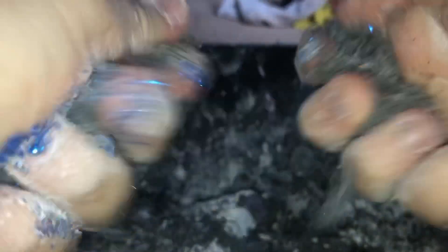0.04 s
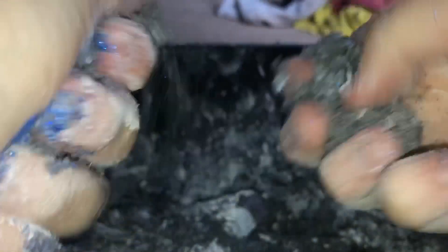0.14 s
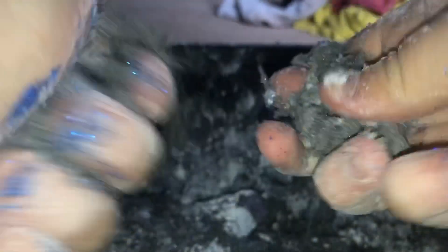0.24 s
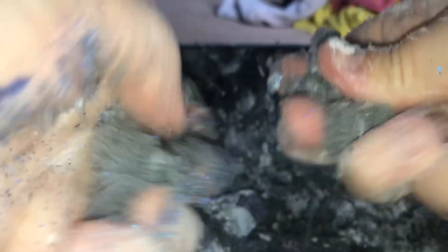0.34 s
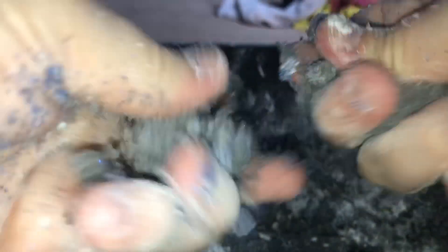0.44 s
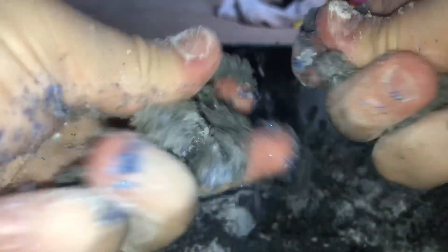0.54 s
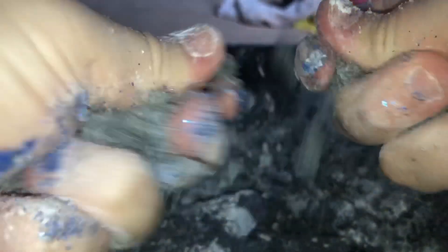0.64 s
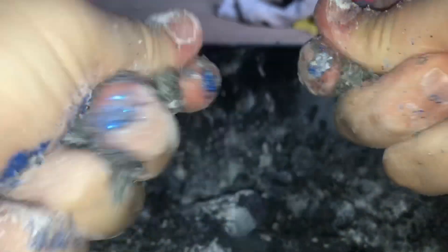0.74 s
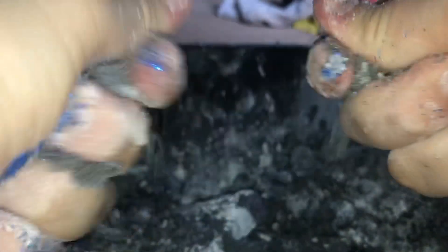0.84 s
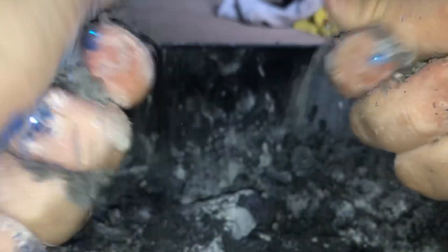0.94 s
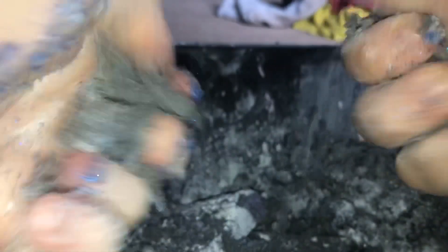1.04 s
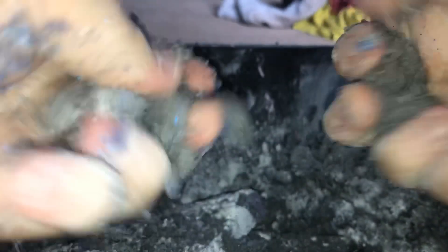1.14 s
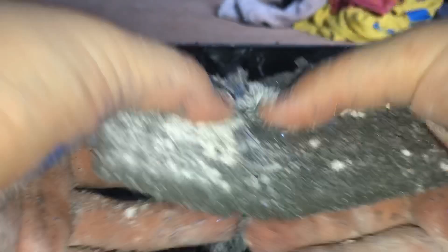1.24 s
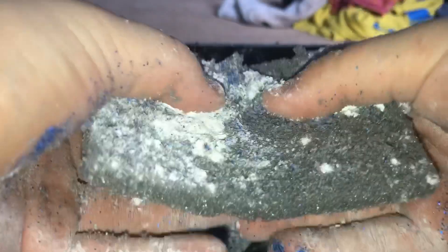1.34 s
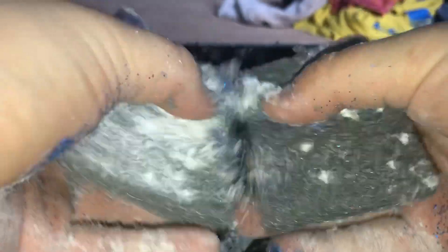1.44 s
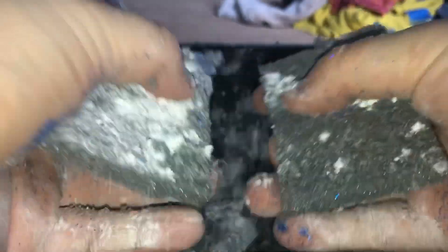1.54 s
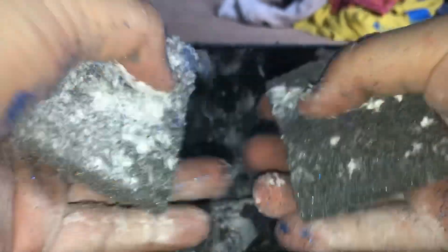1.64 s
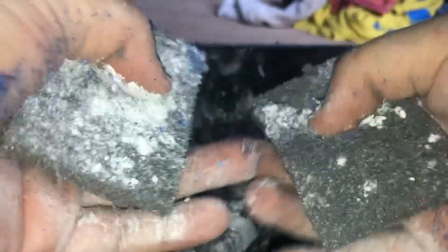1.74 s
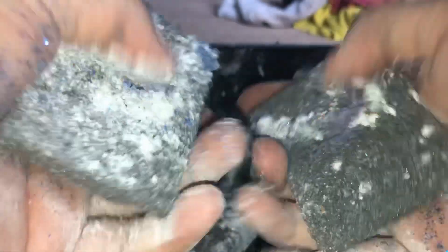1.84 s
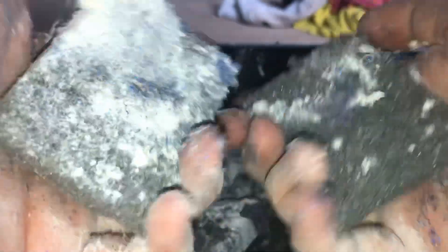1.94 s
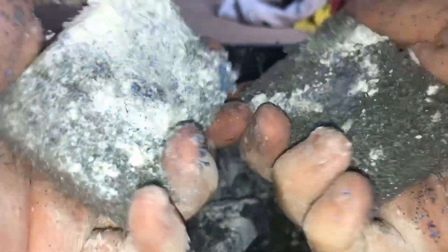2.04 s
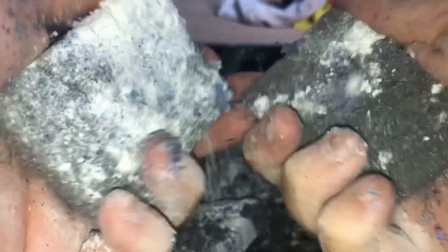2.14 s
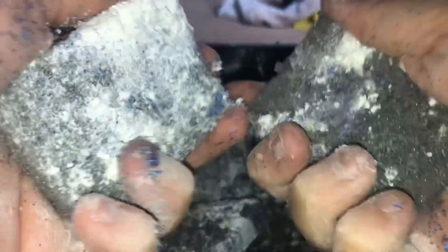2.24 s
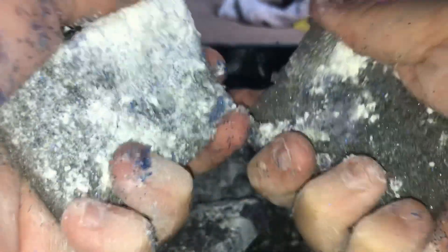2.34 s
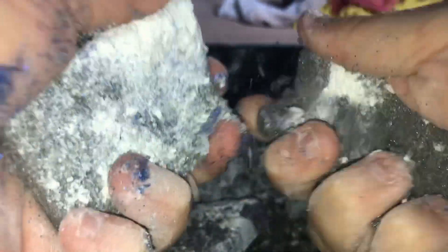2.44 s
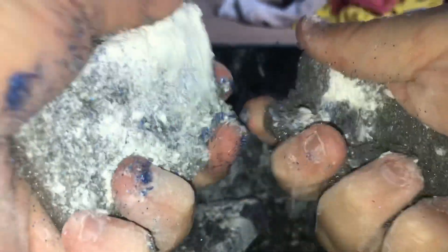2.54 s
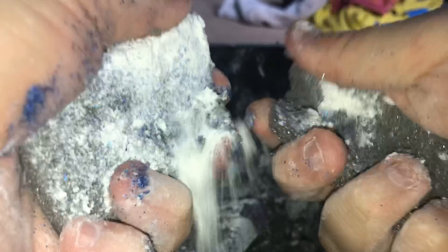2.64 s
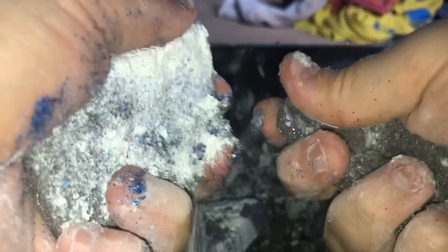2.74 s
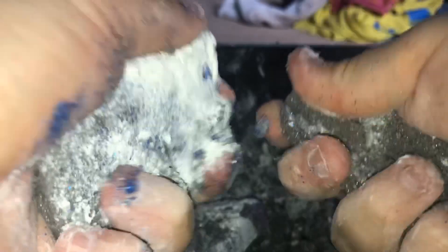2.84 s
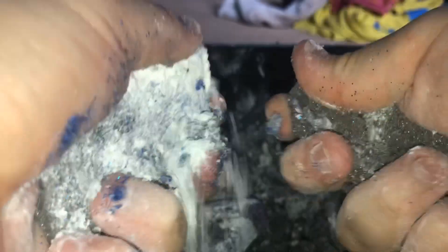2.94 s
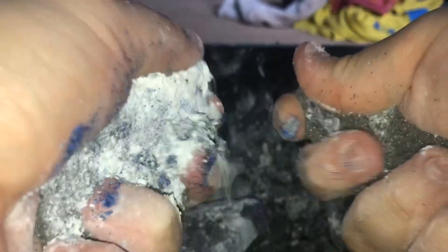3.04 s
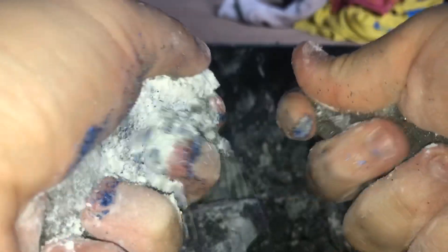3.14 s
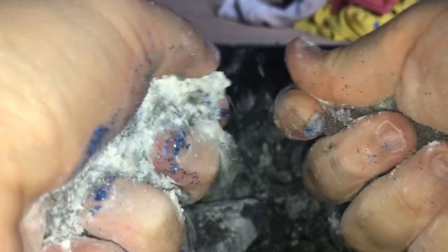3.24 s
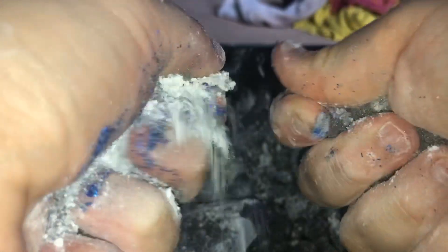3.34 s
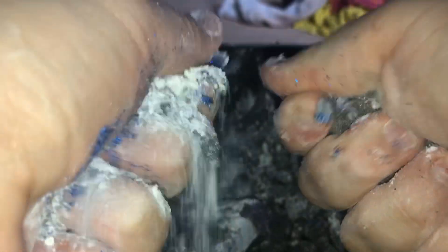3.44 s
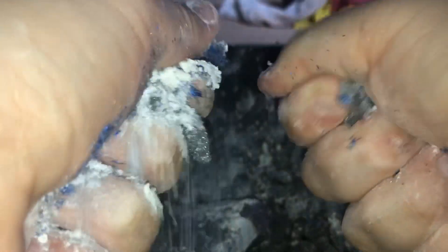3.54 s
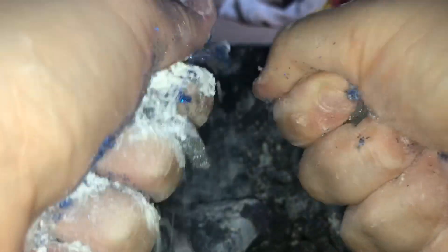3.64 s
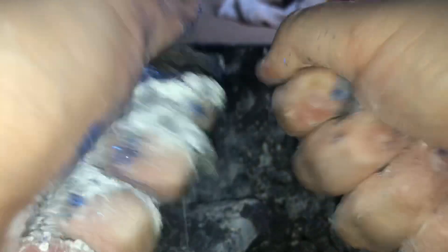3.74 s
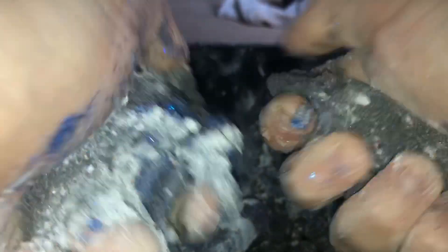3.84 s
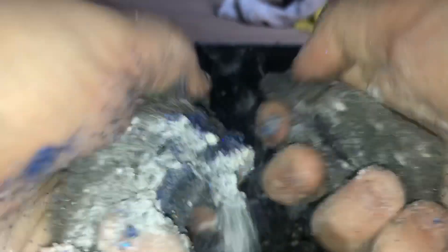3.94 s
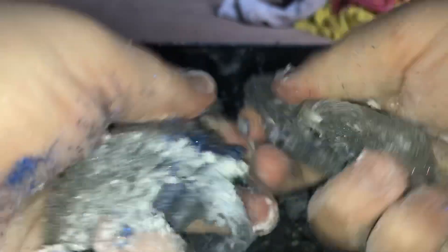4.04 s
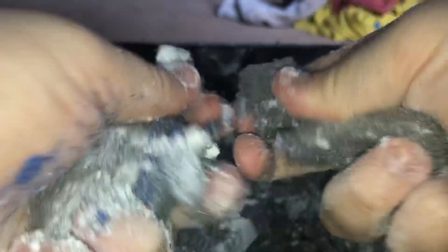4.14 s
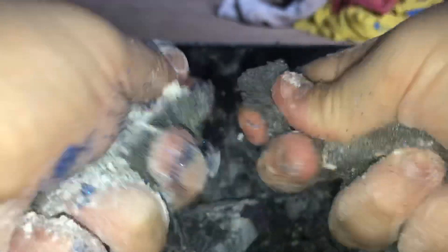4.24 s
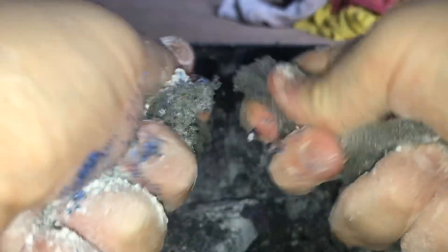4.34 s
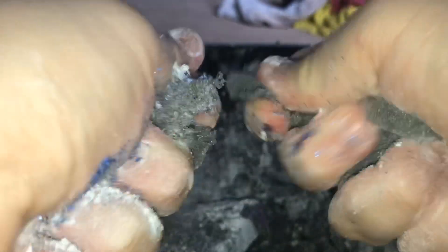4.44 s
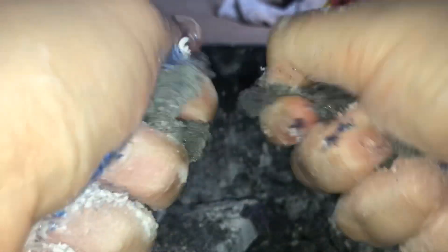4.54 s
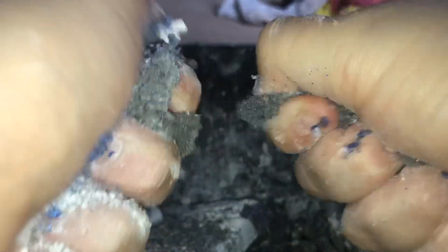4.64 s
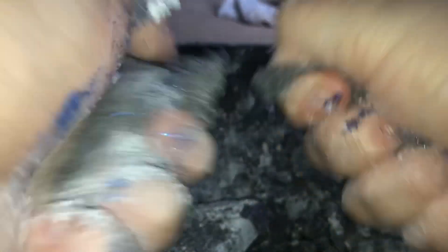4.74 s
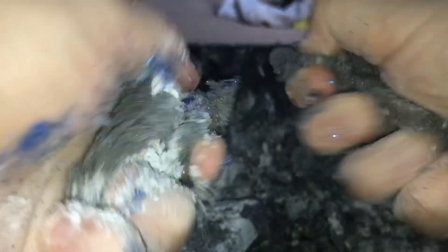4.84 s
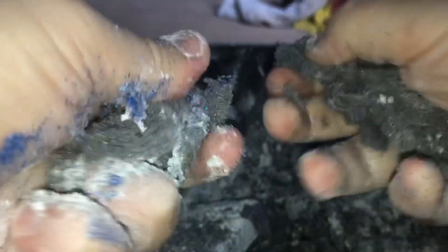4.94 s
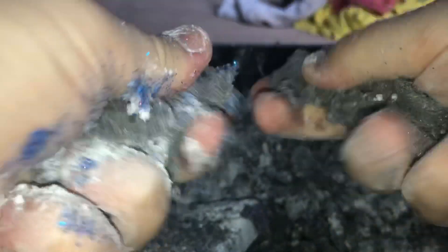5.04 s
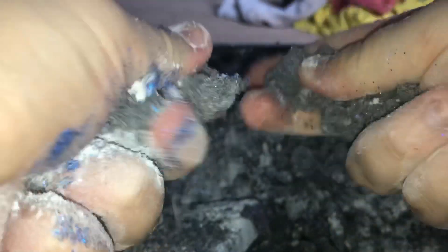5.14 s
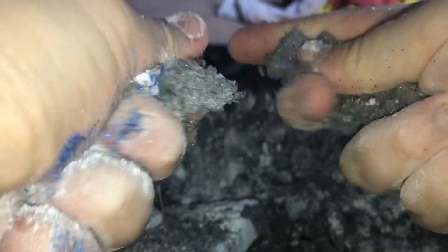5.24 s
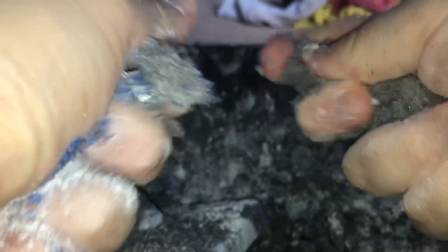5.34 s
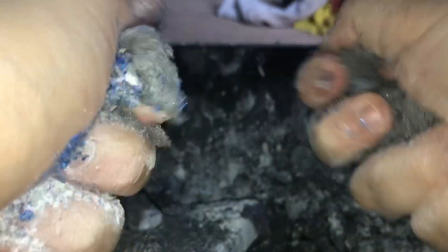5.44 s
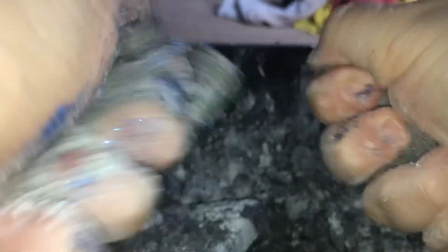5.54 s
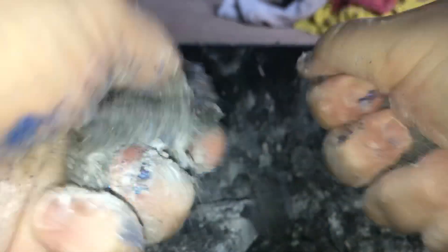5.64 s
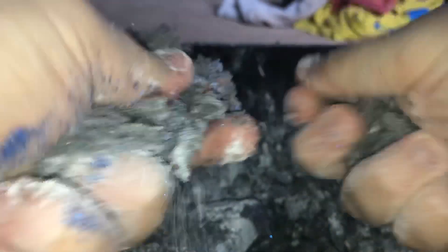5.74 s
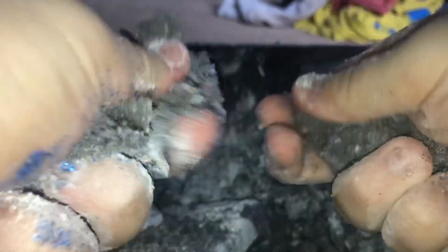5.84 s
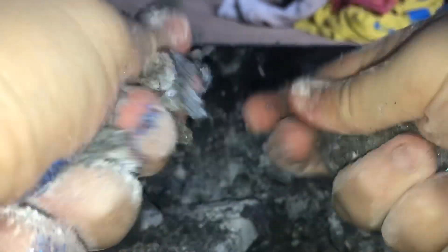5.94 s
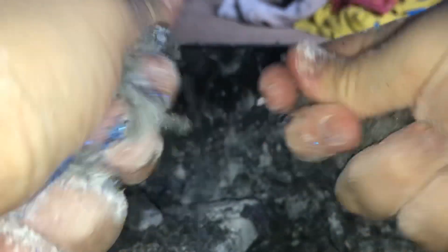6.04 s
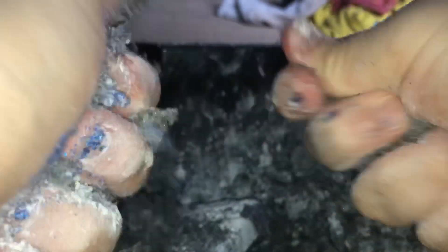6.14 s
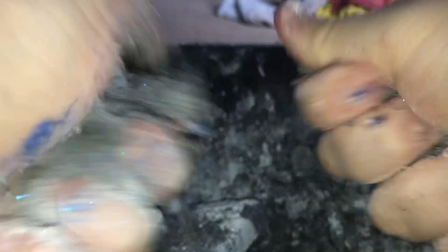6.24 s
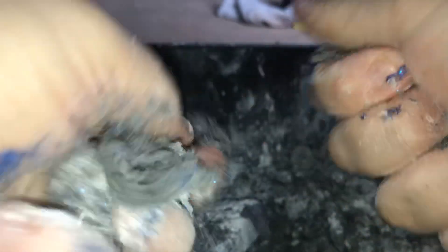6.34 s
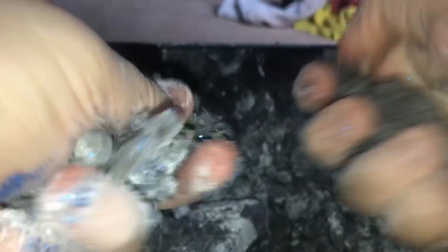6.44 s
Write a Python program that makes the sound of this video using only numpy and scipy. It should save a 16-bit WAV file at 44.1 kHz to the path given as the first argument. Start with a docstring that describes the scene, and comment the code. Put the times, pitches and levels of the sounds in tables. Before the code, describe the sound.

Close, dry crushing of brittle foam: thousands of tiny clicks swell and release with each finger press, over a faint low kneading rumble. Strong snaps come early, then a momentary complete silence, a sharp break of a new block and a quiet crumbling lull. The densest snapping follows, including one short woody knock, before lighter hissy crunching and scrapes to the end, without audible reverberation.

```python
"""Close to a microphone, two hands crush dry, powder-coated floral foam.
Each press of the fingers swells and lets go, breaking cell walls as a dense crunch of clicks, with small chips.
Larger cracks snap through the block as short bursts, resonances colour gritty noise into scrapes and one woody
knock, and lumps give way in low, damped thuds over a rumble of kneading. The bass of every crack arrives
after its treble. A brief, complete silence interrupts the crushing early on."""
import sys
import numpy as np
from scipy import signal
from scipy.fft import rfft, irfft, next_fast_len
from scipy.io import wavfile
from scipy.ndimage import uniform_filter1d, minimum_filter1d

SR = 44100
rng = np.random.default_rng(int(sys.argv[2]) if len(sys.argv) > 2 else 0)


def log_audio(samples):
    """Write samples as a 16-bit WAV file to the path given in sys.argv[1]."""
    # one column per channel
    frames = np.atleast_2d(samples).T
    # limit to full scale, then quantise
    limited = np.clip(frames, -1, 1)
    pcm = np.round(limited * 32767).astype(np.int16)
    wavfile.write(sys.argv[1], SR, pcm)


N = 286209
TIME = np.arange(N) / SR

# All source levels below are those before the mix in scene().
# presses of the fingers: greatest_force_s, rise_s, fall_s, treble_db, middle_db, body_db, rumble_db
PRESSES = [(0.07, 1, 0.051, -37, -53.0, -60, -62.5), (0.341, 0.16, 0.085, -31.5, -50.5, -59, -64.5),
           (0.57, 0.046, 0.052, -17, -44.5, -57, -69), (0.82, 0.38, 0.063, -30.5, -50.5, -55, -64.0),
           (1.097, 0.52, 0.057, -35, -53.5, -61, -67), (1.184, 0.038, 0.036, -32.5, -50, -59.5, -69.0),
           (1.274, 0.0063, 0.033, -43.5, -55.5, -58.5, -81.5),
           (1.426, 0.017, 0.053, -35.5, -48.5, -51, -62.0), (1.604, 0.0048, 0.02, -32.5, -47, -52.5, -60),
           (1.721, 0.039, 0.01, -34, -45.5, -48, -60), (1.886, 0.37, 0.065, -44, -59.0, -62, -69.5),
           (1.966, 0.04, 0.038, -39.5, -60.5, -57, -81), (2.016, 0.0095, 0.029, -37, -60, -59, -77.0),
           (2.123, 0.017, 0.025, -40, -71, -60.5, -75.5), (2.214, 0.14, 0.786, -36, -58, -58, -74.0),
           (2.403, 0.038, 0.065, -25.5, -40.5, -49.5, -68), (2.582, 0.1, 0.094, -29, -46, -61.5, -77),
           (2.667, 0.019, 0.036, -24, -42.5, -55, -60), (2.87, 0.11, 0.16, -26, -44.5, -52, -67),
           (3.007, 0.034, 0.11, -23.5, -40.5, -51, -62.5), (3.097, 0.011, 0.23, -22.0, -43, -54, -67),
           (3.227, 0.12, 0.01, -31, -49, -55, -65.5), (3.446, 0.32, 0.12, -24.5, -43.5, -54, -60.5),
           (3.598, 0.13, 0.062, -29.5, -45, -52.5, -61), (3.869, 0.18, 0.063, -36, -53.5, -55.5, -74),
           (4.052, 0.091, 0.089, -34, -45.5, -52, -66), (4.215, 0.25, 0.21, -24.0, -46.5, -57.5, -61.5),
           (4.475, 0.38, 0.15, -30, -45.5, -55.5, -62.5), (4.762, 0.044, 0.066, -36.5, -51.5, -57.5, -76),
           (4.934, 0.051, 0.019, -32, -58, -63.0, -68.5), (5.048, 0.11, 0.15, -31, -51.5, -61, -62.5),
           (5.266, 0.53, 0.27, -31.5, -49.0, -58, -64.5), (5.592, 0.057, 0.051, -31.5, -50, -56, -66.0),
           (5.739, 0.07, 0.029, -35.5, -50.5, -62.5, -61.5), (5.914, 0.25, 0.058, -32.5, -53.0, -61, -73),
           (6.034, 0.16, 0.19, -33, -52.5, -61, -69), (6.347, 0.36, 0.03, -35, -55, -60, -66),
           (6.398, 0.032, 0.2, -32.5, -56.5, -60, -69.5)]
PRESS_FADE_DB = 10  # how far a press has sunk one rise before, or one fall after, its greatest force
PRESS_ROUNDNESS = 1.395  # 1 is a pointed top, 2 a bell
# steady grip beneath the presses: treble_db, middle_db, body_db, rumble_db
GRIP_LEVELS = (-62, -70, -77, -74)

# loud cracks: start_s, treble_db, middle_db, body_db (rms over CRACK_SPAN_S), decay_s (0.0001 at least)
CRACKS = [(0.316, -37, -30.5, -44.5, 0.00079), (0.4911, -13, -27, -50, 0.000085),
          (0.525, -9, -24, -47, 0.0013), (.6698, -18.5, -19, -41, 0.00018),
          (.813, -19.5, -37, -43.5, 0.0045), (.9904, -29, -43, -63, .0003),
          (1.0258, -25.5, -39, -69, 0.00075), (1.072, -17, -28.5, -46, 0.0017),
          (1.1754, -29, -35.5, -65, .0007), (1.4005, -35, -54, -59, .0004), (1.4068, -34, -47, -66, .0003),
          (1.413, -16, -26, -38.5, 0.0035), (1.428, -25, -37, -54, 0.0023), (1.4331, -16, -28, -28, 0.0012),
          (1.436, -15, -26, -34.5, 0.001), (1.835, -44, -42, -44, 0.0013), (2.1215, -36, -52, -48.5, .0005),
          (2.3772, -23.5, -48, -57, 0.0011), (2.3975, -12, -16.5, -27, 0.00037),
          (2.4097, -18, -28.5, -39, 0.0035), (2.661, -18, -24, -47, 0.0032), (2.7914, -15, -37, -61, .0003),
          (2.8108, -17, -32, -54, 0.00024), (2.8185, -18, -36, -57, 0.00015),
          (2.8427, -12, -37, -65, 0.00034), (2.8719, -18, -50, -65, 0.000091),
          (2.8775, -17.5, -52, -60, 0.00029), (2.9987, -18, -19, -54, 0.0018),
          (3.0104, -36, -27, -39, 0.00068), (3.036, -25, -26.5, -39, 0.0015),
          (3.0995, -21, -31.5, -46, 0.00044), (3.1068, -21, -35, -55, .0002),
          (3.118, -16, -26, -36.5, .0012), (3.1938, -13.5, -35, -55, 0.00023),
          (3.158, -24, -33, -50, .0009), (3.2204, -28, -24.5, -40, .0015), (3.2942, -18, -21.5, -32, .0025),
          (3.3663, -11.5, -26, -34.5, 0.0017), (3.3729, -18, -23.5, -40, 0.00033),
          (3.449, -20, -26, -38, 0.0019), (3.4899, -39, -32, -38, 0.0022),
          (3.599, -18, -29.5, -32.5, 0.0019), (3.6908, -32, -42, -60, .0005),
          (3.7301, -33.5, -44, -54, 0.00059), (3.9195, -30, -37.5, -65, .0002),
          (4.084, -32, -28, -44, 0.00044), (4.1509, -19, -40, -56, .0003), (4.1611, -15, -26, -62, 0.00064),
          (4.191, -9.5, -17.5, -55, 0.0017), (4.2079, -16, -37, -60.5, .0004),
          (4.213, -13, -21.5, -64, 0.00072), (4.322, -13, -31, -56, 0.00069),
          (4.33, -23, -39, -51, 0.00049), (4.42, -35, -36, -37, .0006), (4.4608, -12, -28.5, -53, 0.00051),
          (4.4656, -14.5, -43, -48, 0.0015), (4.49, -38, -38, -41.5, 0.00068),
          (4.7763, -42, -36.5, -45, 0.0015), (4.8462, -37, -37.5, -47, 0.00067),
          (4.928, -23, -35, -69, 0.00017), (5.0256, -39, -37, -38, 0.0011),
          (5.048, -21, -27.5, -43, 0.0023), (5.1822, -14.5, -26.5, -46, 0.00019),
          (5.2754, -20.5, -29, -64, 0.00025), (5.284, -25, -36, -61, 0.00043),
          (5.8252, -26.5, -34, -69, .0004), (6.1871, -25.5, -50, -63, 0.00031),
          (6.339, -12.5, -30, -52, 0.00024), (6.3443, -20, -46, -56, 0.00034),
          (6.4088, -24.5, -41, -62, 0.00087)]
CRACK_SPAN_S = .002
CRACK_SIZE, CRACK_LEAD = 2048, 256  # samples in all, samples before the sharp break
# colour of a loud crack relative to the foam: frequency_hz, level_db
CRACK_COLOUR = [(200, -7.5), (420, 1), (750, -0.5), (1100, -0.5), (1800, 2), (2700, -2.5), (5000, -3),
                (9000, -5), (16000, -8.5)]
# modes of the block while it is still whole: frequency_hz, width_hz, level_db
BLOCK_MODES = [(910, 180, -10), (2340, 150, 10), (3940, 150, -5), (4810, 140, -13)]
BLOCK_WHOLE_S = (1.3, 1.445)
# small chips relative to the press that breaks them: treble_db, middle_db, body_db
CHIP_LEVELS = (3, 4, 1)
CHIPS_PER_S, CHIP_DECAY_S = 20, .00018

# narrow-band scrapes of foam, and one short woody knock resonance near 1060 Hz:
# start_s, length_s, level_db, centre_hz, width_hz (before the widening in scrapes_and_knock)
SCRAPES_AND_KNOCK = [(0.0, 0.1, -44, 10900, 890), (0.125, 0.22, -45.5, 4200, 1200),
                     (0.28, 0.1, -29, 4000, 800), (0.29, 0.082, -36, 2650, 400),
                     (0.287, 0.21, -42, 4760, 600), (0.438, 0.08, -28, 11700, 1200),
                     (0.65, 0.047, -51, 3020, 500), (0.86, 0.36, -35, 5900, 1210),
                     (1.235, 0.081, -41, 4160, 1500), (3.588, 0.022, -33, 1060, 250),
                     (4.715, 0.077, -44, 3500, 250), (4.792, 0.21, -40, 4600, 700),
                     (4.92, 0.27, -33.5, 6900, 900), (5.54, 0.12, -39.5, 3180, 600),
                     (5.575, 0.19, -41.5, 4720, 1200), (5.87, 0.15, -34, 12100, 600),
                     (6.276, 0.1, -35, 5600, 900)]
# lumps giving way: peak_s, level_db (peak of the envelope), pitch_hz
THUDS = [(.345, -54, 110), (0.81, -54, 110), (1.435, -54.5, 65), (1.439, -44.5, 190), (1.712, -70, 65),
         (1.713, -52, 154), (2.41, -52.5, 140), (2.675, -53, 70), (3.045, -44, 179), (3.365, -44.5, 129),
         (3.451, -45, 172), (3.597, -49.5, 122), (3.931, -47.5, 133), (4.159, -43.5, 134), (4.185, -57, 85),
         (4.389, -50, 140), (5.034, -49, 113), (5.635, -59, 70), (5.704, -49.5, 150)]

# colour of breaking foam: frequency_hz, level_db per Hz
FOAM = [(70, -37.5), (160, -12), (300, -18), (530, -20), (830, -21.5), (1160, -12), (2100, -9), (3100, -3),
        (4800, -1), (7000, 4), (10000, 2.5), (13300, 2.5), (15700, 0)]
# hollows between the fingers and the block: centre_hz, width_hz, level_db
HOLLOWS = [(728, 146, 6), (1790, 190, 1), (3130, 600, 1.5), (7100, 1200, -0.5), (11320, 500, 2)]
# lower edges of body, middle and treble, for cracks and chips, then for the crunch
BAND_EDGES_HZ, CRUNCH_EDGES_HZ = (200, 1000, 4000), (200, 1000, 2500)
# colour of the kneading: frequency_hz, level_db per Hz
RUMBLE = [(15, -30), (30, -22), (55, -3.5), (110, -1), (180, -3.5), (260, -11), (500, -48)]

SILENCE_S = (1.199, 1.268)  # start, end
CEILING_DB, EDGE_HZ = -1.2, 15830  # limiter ceiling, upper band limit


def pressing():
    """Superposition of power: presses add to the grip; gives crunch gains by band, and the rumble gain."""
    t = TIME[::32]
    power = amp(GRIP_LEVELS)[:, None] ** 2 * np.ones(len(t))
    for s, rise_s, fall_s, *levels_db in PRESSES:
        away = abs(t - s) / np.where(t < s, rise_s, fall_s)
        press_db = np.array(levels_db)[:, None] - PRESS_FADE_DB * away ** PRESS_ROUNDNESS
        power = power + amp(press_db) ** 2
    *force, rumble = (np.interp(TIME, t, np.sqrt(band)) for band in power)
    return np.array(force), rumble


def fragment(ring_s, scatter, size=128):
    """Impulse response: a click, then its decaying scatter inside one small piece of foam."""
    echo = rng.standard_normal(size) * np.exp(-np.arange(size) / SR / ring_s)
    echo *= scatter / np.linalg.norm(echo)
    echo[0] = 1
    return echo


def crunch(force, per_s=5500, spread_db=3.5, clump_db=1.15, stick_db=1.33, powder_db=-7, shift=.8,
           crumbs_per_s=200, crumb_db=20.0, count=12):
    """Shot noise: cell walls break in clumps in several fragments, over the hiss of rubbing powder."""
    grains = np.zeros(N)
    for _ in range(count):
        # per_s is the median rate of all fragments together; each has its own flurries
        breaks = rng.random(N) < per_s / count / SR * np.exp(shift * wander(14))
        sizes = amp(spread_db * np.minimum(rng.exponential(1, N), 4.5)) * rng.choice([-1, 1], N)
        grains += signal.oaconvolve(breaks * sizes, fragment(ring_s=0.00052, scatter=2.37))[:N]
    # whole crumbs pop off in flurries of dry ticks; crumbs_per_s is their median rate
    pops = rng.random(N) < crumbs_per_s / SR * np.exp(.7 * wander(12))
    crumbs = pops * amp(crumb_db + rng.uniform(-11.5, 0.84, N)) * rng.choice([-1, 1], N)
    avalanches = amp(clump_db * wander(110) + stick_db * wander(74))
    powder = amp(powder_db) * rng.standard_normal(N)
    drive = rfft((unit(grains) + powder) * avalanches + crumbs)
    bands = foam_bands(N, CRUNCH_EDGES_HZ)
    return sum(unit(irfft(drive * band, N)) * gain for gain, band in zip(force, bands))


def crack(gains, decay_s, bands, first=2.3, ragged_db=3.5, strain=0.14, strain_s=0.00065,
          debris=0.043, debris_s=0.0021):
    """Brittle fracture: tiny strain clicks, one sharp break, a quick run of smaller ones, then debris."""
    t = (np.arange(CRACK_SIZE) - CRACK_LEAD) / SR
    sign, strength = rng.standard_normal((2, CRACK_SIZE))
    before = strain * np.exp(-abs(t) / strain_s)
    after = np.exp(-abs(t) / max(decay_s, 1e-4)) + debris * np.exp(-abs(t) / debris_s)
    run = unit(sign * amp(ragged_db * strength)) * np.where(t < 0, before, after)
    run[CRACK_LEAD] = first
    parts = irfft(rfft(run) * bands, CRACK_SIZE)
    # each band gets rms 1 over the crack span before its gain
    parts *= np.sqrt(CRACK_SPAN_S * SR) / np.linalg.norm(parts, axis=1, keepdims=True)
    return gains @ parts


def cracks():
    """Modal excitation: loud cracks; those that snap the fresh block in two also ring its modes."""
    hz = np.fft.rfftfreq(CRACK_SIZE, 1 / SR)
    bands = foam_bands(CRACK_SIZE) * amp(read(CRACK_COLOUR, hz))
    out = np.zeros(N)
    for s, *levels_db, decay_s in CRACKS:
        add(out, s - CRACK_LEAD / SR, crack(amp(levels_db), decay_s, bands))
    snap = out * ((TIME > BLOCK_WHOLE_S[0]) & (TIME < BLOCK_WHOLE_S[1]))
    return out + sum(amp(db) * resonate(snap, f, width) for f, width, db in BLOCK_MODES)


def chips(force, count=200):
    """Poisson process: small cracks at chance moments, in proportion to the press that breaks them."""
    out, bands = np.zeros(N), foam_bands(CRACK_SIZE)
    for s in np.cumsum(rng.exponential(1, count)) / CHIPS_PER_S:
        if s < TIME[-1]:
            gains = force[:, int(s * SR)] * amp(CHIP_LEVELS)
            add(out, s - CRACK_LEAD / SR, crack(gains, CHIP_DECAY_S, bands))
    return out


def scrapes_and_knock(grit_db=7.0, widening=1.8):
    """Resonance: gritty noise swells and fades in a narrow band, as scrapes and one short woody knock."""
    out, grit = np.zeros(N), rng.standard_normal(N) * amp(grit_db * wander(250))
    for s, length, db, hz, width in SCRAPES_AND_KNOCK:
        burst = grit[max(round(s * SR), 0):][:round(length * SR)]
        # two equal resonances in series, which together are narrower than either
        band = resonate(resonate(burst, hz, widening * width), hz, widening * width)
        add(out, s, amp(db) * unit(band) * signal.windows.tukey(len(band), .8))
    return out


def thuds(cycles=0.92):
    """Damped oscillation: a lump collapses in a low push that dies within a few cycles."""
    out, t = np.zeros(N), np.arange(SR // 8) / SR
    for s, db, hz in THUDS:
        age = t * hz / cycles  # the envelope peaks at age 1
        push = amp(db) * age * np.exp(1 - age) * np.sin(2 * np.pi * hz * t)
        add(out, s - cycles / hz, push)
    return out


def kneading(lumpy_db=3.0):
    """Modulated noise: the uneven low rumble of the fingers working the foam."""
    colour = amp(read(RUMBLE, np.fft.rfftfreq(N, 1 / SR)))
    noise = irfft(rfft(rng.standard_normal(N)) * colour, N)
    return unit(noise * amp(lumpy_db * wander(25)))


def foam_bands(size, edges=BAND_EDGES_HZ):
    """Spectral filtering: the response of foam and hollows, split into treble, middle and body."""
    hz = np.fft.rfftfreq(size, 1 / SR)
    hollows_db = sum(db / (1 + (2 * (hz - f) / width) ** 2) for f, width, db in HOLLOWS)
    colour = amp(read(FOAM, hz) + hollows_db)
    low, middle, high = (1 - 1 / (1 + (hz / edge) ** 8) for edge in edges)
    return colour * np.array([high, middle - high, low - middle])


def uneven_colour(x, patchy_db, size=1024):
    """Time-varying filtering: random, smoothed gains make the colour uneven in time and frequency."""
    z = signal.stft(x, nperseg=size)[2]
    patches = rng.standard_normal(z.shape)
    for _ in range(2):
        across_frequency = uniform_filter1d(patches, size=7, axis=0)
        patches = uniform_filter1d(across_frequency, size=3, axis=1)
    return signal.istft(z * amp(patchy_db * unit(patches)), nperseg=size)[1][:N]


def disperse(x, cycles=1.598, corner_hz=7000):
    """Dispersion: well below the corner, delay is a near-fixed number of cycles, so a click falls in pitch."""
    size = next_fast_len(N + SR)
    hz = np.fft.rfftfreq(size, 1 / SR)
    phase = -2 * np.pi * cycles * np.log((hz + 10) / (hz + corner_hz))
    return irfft(rfft(x, size) * np.exp(1j * phase), size)[:N]


def resonate(x, hz, width):
    """Resonance: a band-pass of gain 1 at its centre."""
    return signal.lfilter(*signal.iirpeak(hz, hz / width, fs=SR), x)


def wander(hz):
    """Low-pass noise: smooth chance of rms 1 that varies mostly slower than hz."""
    f = np.fft.rfftfreq(N, 1 / SR)
    return unit(irfft(rfft(rng.standard_normal(N)) * np.exp(-(f / hz) ** 2), N))


def amp(db):
    """Logarithmic level: decibels to gain."""
    return 10 ** (np.asarray(db) / 20)


def unit(x):
    """Normalisation: scales to rms 1."""
    return x / np.sqrt(np.mean(x ** 2) + 1e-20)


def read(points, hz):
    """Interpolation: reads a spectrum on a log-frequency axis."""
    f, value = np.transpose(points)
    return np.interp(np.log(hz + 1), np.log(f + 1), value)


def add(mix, s, sound):
    """Superposition: adds a sound to the mix at time s."""
    part = mix[max(round(s * SR), 0):][:len(sound)]
    part += sound[:len(part)]


def scene():
    """Superposition: presses drive crunch, chips and rumble; all but the rumble is dispersed."""
    force, rumble = pressing()
    breaking = amp(-0.74) * uneven_colour(crunch(force), patchy_db=0.96) + amp(0.02) * cracks()
    handling = amp(-5.0) * scrapes_and_knock() + amp(-1.0) * thuds()
    low = amp(0.7) * rumble * kneading()
    return (disperse(breaking + handling + chips(force)) + low)[None]


def record(dry, recovery_db_per_s=1000):
    """Peak limiting: holds down the sharpest peaks; then the brief silence and the band limit."""
    over_db = np.maximum(20 * np.log10(abs(dry[0]) + 1e-9) - CEILING_DB, 0)
    fall = TIME * recovery_db_per_s
    duck_db = np.maximum.accumulate(over_db + fall) - fall  # instant rise, steady recovery
    gain = amp(uniform_filter1d(minimum_filter1d(-duck_db, size=65), size=65))
    audible = (TIME < SILENCE_S[0]) | (TIME > SILENCE_S[1])
    gate = uniform_filter1d(1. * audible, size=64)
    band_limit = signal.firwin(801, EDGE_HZ, window=("kaiser", 8), fs=SR)
    return signal.oaconvolve(dry * gain * gate, band_limit[None], "same")


dry = scene()
out = record(dry)
log_audio(out)
```